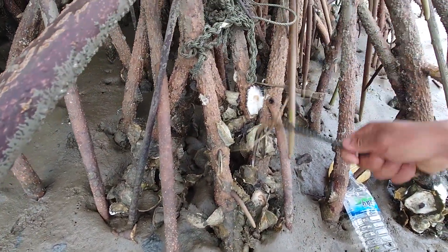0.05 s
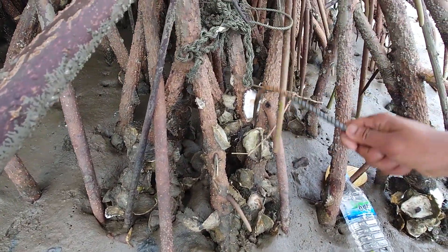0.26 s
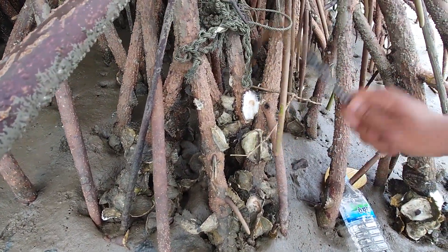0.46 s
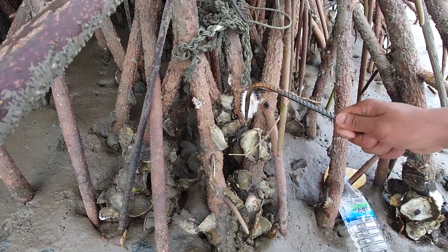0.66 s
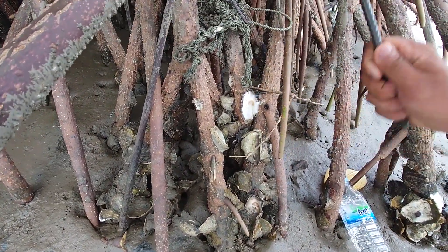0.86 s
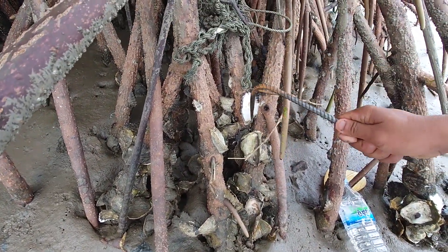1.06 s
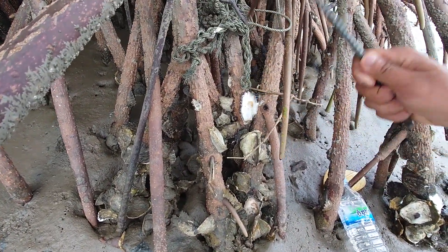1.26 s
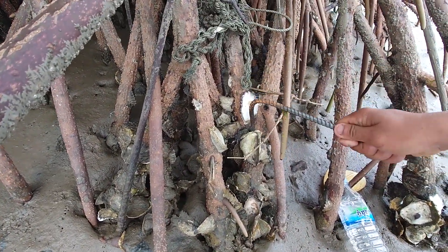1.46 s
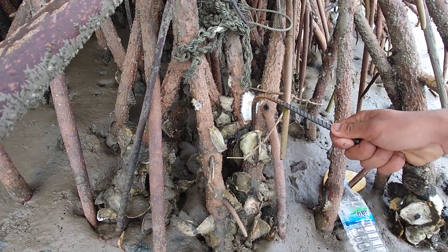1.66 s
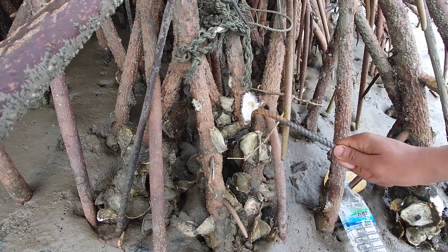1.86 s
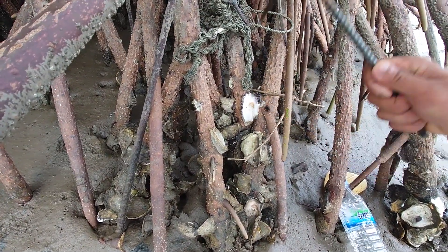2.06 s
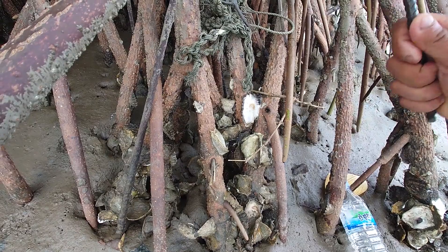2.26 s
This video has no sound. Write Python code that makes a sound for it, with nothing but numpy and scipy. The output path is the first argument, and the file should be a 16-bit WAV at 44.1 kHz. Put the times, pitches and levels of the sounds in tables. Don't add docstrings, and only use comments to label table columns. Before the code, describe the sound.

A steel rod strikes oyster shells on mangrove roots, four sharp bouncing clacks about half a second apart, then fine grit and chips tick down; outdoors in a swamp, close stereo microphone, faint low engine rumble behind.

```python
import sys
import numpy as np
from scipy import signal
from scipy.fft import rfft, irfft, next_fast_len
from scipy.io import wavfile
from scipy.ndimage import uniform_filter1d, map_coordinates

SR = 44100
rng = np.random.default_rng(int(sys.argv[2]) if len(sys.argv) > 2 else 0)


def decibels_to_gain(level_db):
    exponent = np.asarray(level_db, float) / 20
    return 10 ** exponent


def digitize_waveform(pressure):
    field = np.atleast_2d(pressure).T
    bounded = np.clip(field, -1, 1)
    quanta = np.round(bounded * 32767).astype(np.int16)
    wavfile.write(sys.argv[1], SR, quanta)


N = 101429
TIME_S = np.arange(N) / SR


def unit(x):
    return x / np.sqrt(np.mean(x ** 2) + 1e-20)


def along(points, hz):
    f, v = np.transpose(points)
    return np.interp(np.log(hz + 1), np.log(f + 1), v)


def level(rows):
    s, db = np.transpose(rows)
    return decibels_to_gain(np.interp(TIME_S, s, db))


def wobble(rate_hz):
    return map_coordinates(rng.standard_normal(80), [TIME_S * rate_hz], mode="wrap")


def filtered(x, response):
    n = x.shape[-1]
    padded = next_fast_len(n + 8192)
    spectrum = rfft(x, padded) * response(np.fft.rfftfreq(padded, 1 / SR))
    return irfft(spectrum, padded)[..., :n]


def resonance(hz, width_hz):
    return lambda f: 1 / (1 + ((f - hz) / width_hz) ** 2)


def paired(two, alike):
    def mid_side(hz):
        turn = np.arccos(np.clip(along(alike, hz), -1, 1)) / 2
        return np.array([np.cos(turn), np.sin(turn)])
    mid, side = filtered(two, mid_side)
    return np.array([mid + side, mid - side])


# (frequency [Hz], left-right likeness [0-1])
FAR_LIKENESS = [(100, 0.99), (500, 0.61), (1100, 0.017), (15000, .02)]


def noise(response):
    return unit(paired(filtered(rng.standard_normal((2, N)), response), FAR_LIKENESS))


# (frequency [Hz], density [dB per Hz])
RUMBLE_COLOUR = [(20, -41), (34, -23.5), (42, -2.5), (95, -3), (150, -13), (200, -17), (354, -19),
                 (600, -38.5), (800, -86)]
# (frequency [Hz], width [Hz], lift [dB])
ENGINE_TONES = [(45.3, 6.2, 5), (74.5, 5.8, 3), (121, 4.2, 5), (182, 7.4, 7.5)]
# (time [s], level [dB])
RUMBLE_LEVEL = [(0, -47.5), (.5, -48.5), (1, -47), (1.5, -50.5), (1.9, -48), (2.3, -46.5)]


def far_engine():
    def response(f):
        lift_db = sum(db * resonance(hz, width)(f) for hz, width, db in ENGINE_TONES)
        return decibels_to_gain(along(RUMBLE_COLOUR, f) + lift_db)
    drone = noise(response) * decibels_to_gain(2.3 * wobble(15))
    pan = decibels_to_gain(np.array([[.5], [-.5]]) * -3)
    return level(RUMBLE_LEVEL) * unit(drone) * pan


# (frequency [Hz], density [dB per Hz])
AIR_COLOUR = [(480, -8), (1370, -4), (1850, -8), (2300, -18.5), (5800, -26.5), (7450, -32), (9300, -29),
              (15300, -19.5)]


def forest_air():
    air = decibels_to_gain(-65 + .8 * wobble(6.9)) * noise(lambda f: decibels_to_gain(along(AIR_COLOUR, f)))
    hum = decibels_to_gain(-77) * noise(resonance(1711, 20))
    return air + hum


# (time [s], level [dB])
WHINE_LEVEL = [(0.0, -74.5), (.8, -75.5), (1.5, -78), (2.3, -72)]
# (time [s], level [dB])
CHIRR_LEVEL = [(0, -69), (.11, -72.5), (.16, -95.5), (2.3, -96.5)]


def insects():
    WHINE_HZ, DRIFT_HZ, PULSE_HZ, PULSE_DB = 8228, 46, 15.6, 5
    pulse_turn = 2 * np.pi * PULSE_HZ * TIME_S + 3.4 * wobble(2.2)
    pulse_db = PULSE_DB * np.sin(pulse_turn) + wobble(5.5)
    chirr = level(CHIRR_LEVEL) * noise(resonance(3180, 60))
    turns = np.cumsum(WHINE_HZ + DRIFT_HZ * wobble(30)) / SR + rng.random((2, 1))
    whine = .8 * unit(np.sin(2 * np.pi * turns)) + .5 * noise(resonance(WHINE_HZ, 90))
    return chirr + level(WHINE_LEVEL) * decibels_to_gain(pulse_db) * whine


# (frequency [Hz], level [dB])
FOREST_COLOUR = [(300, -21), (1500, -6), (2400, -5.5), (3300, -3), (6300, -4.5), (7500, -9), (10000, -9),
                 (15000, -10)]


def sand_trickle():
    MIDDLE_S, WIDTH_S, LEVEL_DB = 1.6, 0.065, -71.5
    swell = np.exp(-((TIME_S - MIDDLE_S) / WIDTH_S) ** 2)
    sand = rng.standard_normal((2, N)) ** 3
    return decibels_to_gain(LEVEL_DB) * swell * unit(filtered(sand, lambda f: decibels_to_gain(along(FOREST_COLOUR, f))))


# (time [s], peak level [dB])
GRIT = [(1.5518, -53), (1.5722, -47), (1.6121, -49), (1.6401, -52), (1.6665, -52), (1.6969, -56),
        (1.7323, -50), (1.8291, -64), (1.8825, -54), (1.9005, -57), (1.9229, -57), (1.9394, -54),
        (1.9763, -63), (2.0576, -66), (2.113, -64), (2.1329, -66), (2.1689, -71), (2.1813, -64),
        (2.2008, -68), (2.2372, -66)]


def grit_pitches():
    GRIT_HZ, GRIT_SPREAD = 14200, 0.041
    return [(s, db, GRIT_HZ * (1 + GRIT_SPREAD * rng.standard_normal())) for s, db in GRIT]


def falling_bits(rows, gain_db, cycles, spit_size, thinning):
    out, t = np.zeros((2, N + SR)), np.arange(SR // 50) / SR
    for s, db, hz in rows:
        swell = t * hz / cycles * np.exp(1 - t * hz / cycles)
        tone = np.sin(2 * np.pi * (hz * t + rng.random((2, 1)))) * swell
        rough = unit(uniform_filter1d(rng.standard_normal((2, len(t))), size=24))
        spit = signal.lfilter([1, -thinning], 1, rng.standard_normal((2, len(t))))
        spit = spit * spit_size * np.exp(-t / 0.0015)
        out[:, round(s * SR):][:, :len(t)] += decibels_to_gain(db + gain_db) * (tone * (1 + .5 * rough) + spit)
    return out[:, :N]


# (time [s], peak level [dB], frequency [Hz])
TICKS = [(.0645, -62, 14500), (.079, -63, 13500), (.0955, -59.5, 7230), (.79, -69, 4020),
         (.894, -55, 11900), (1.4385, -57.5, 13800), (1.587, -48, 13800), (1.686, -71.5, 6500),
         (1.764, -64, 5980), (1.848, -64.5, 3990), (1.871, -68, 5200), (1.893, -62, 5090),
         (1.896, -62, 3500), (1.923, -58, 3430), (1.939, -68, 6500), (2.012, -63, 4300),
         (2.017, -68.5, 5960), (2.08, -69.5, 5300)]


def grit_and_chips(grit):
    return falling_bits(grit, 0.5, 3.6, 0.65, 0.45) + falling_bits(TICKS, -1.5, 4.8, 1.2, 0.7)


def scatter(x, t60s, length, rise_s):
    hz, t, z = signal.stft(rng.standard_normal((2, length)), SR, nperseg=128)
    shape = decibels_to_gain(-60 * t / along(t60s, hz)[:, None]) * np.clip(t / rise_s, 0, 1)
    tail = signal.istft(z * shape, SR, nperseg=128)[1]
    return signal.fftconvolve(x, tail / np.linalg.norm(tail[0]), axes=1)


# (frequency [Hz], density [dB per Hz])
CRUNCH_COLOUR = [(120, -40), (200, -19.5), (1420, -8.5), (2460, -11), (4370, -7.5), (6430, -10.5),
                 (7060, -12), (14800, -6.5), (16500, -34)]


def contact(modes, tilt_db):
    RING_DB, CRUNCH_DB, CRUNCH_T60_S = 2, -11.5, 0.043
    RISE_S, CRACKS_S, CRACK_SIZE = 0.0002, 0.0018, 0.006
    MODE_SPREAD_DB, IN_STEP_BELOW_HZ, TILT_FROM_HZ = 1, 2200, 2400
    t = np.arange(SR // 10) / SR
    hz, width, db = np.transpose(modes)[:, :, None]
    width = np.maximum(width, 30 + .003 * hz)
    turns, _ = rng.random((2, len(modes), 1))
    sizes = rng.standard_normal((2, len(modes), 1))
    in_step = np.arange(len(modes))[:, None] / 2 + [[[0]], [[.25]]]
    starts = in_step + np.where(hz < IN_STEP_BELOW_HZ, 0, turns)
    decay = decibels_to_gain(db + MODE_SPREAD_DB * sizes) * width * np.exp(-np.pi * width * t)
    ring = (decay * np.sin(2 * np.pi * (hz * t + starts))).sum(1)
    cracks = rng.standard_normal((2, len(t))) ** 3 * np.exp(-t / CRACKS_S) * CRACK_SIZE
    cracks[:, 0] = 1
    ring = signal.fftconvolve(ring, cracks, axes=1)[:, :len(t)]

    def crunch_response(f):
        tilt = tilt_db * np.log2(np.maximum(f, TILT_FROM_HZ) / TILT_FROM_HZ)
        return decibels_to_gain(along(CRUNCH_COLOUR, f) + tilt)
    grains = filtered(rng.standard_normal((2, len(t))), crunch_response)
    crunch = decibels_to_gain(CRUNCH_DB - 60 * t / CRUNCH_T60_S) * unit(grains)
    return np.array([decibels_to_gain(RING_DB) * ring / abs(ring).max(), crunch]) * (1 - np.exp(-t / RISE_S))


# (time [s], peak level [dB], body number, treble tilt [dB per octave], echo level [dB])
CONTACTS = [(-.13, -5, 1, 9, 2), (0.1286, -4.5, 0, -1, -5.5), (0.1441, -4, 6, -4.5, 1.5),
            (0.165, -28.5, 10, 0, -7.5), (0.206, -36.5, 9, 3, -15), (0.5696, -9.5, 1, -5, 11),
            (0.5855, -14, 7, -5.5, -1), (0.642, -35.5, 4, -9, 0.5), (1.0073, -11, 2, -1.5, 12.5),
            (1.0259, -15.5, 8, -8, 2.5), (1.037, -21, 10, -9, -1), (1.3872, -30, 5, 5, 4),
            (1.4678, -7, 3, -4, 7.5), (1.508, -30, 8, -2, -13)]
# (frequency [Hz], width [Hz], level [dB])
SHELL_A = [(730, 280, -10), (1084, 88, -3.5), (1440, 100, -0.5), (2850, 110, -13.5), (3600, 240, -2.5),
           (4240, 54, -3), (4880, 100, -5.5), (5550, 55, -9), (6230, 110, 0), (7700, 210, -9.5),
           (8150, 200, -7.5), (10170, 150, 1.5), (11600, 83, 0), (14100, 120, -7.5)]
SHELL_B = [(454, 86, -8.5), (739.5, 100, -1), (1120, 190, -1), (1447, 240, 4.5), (2015, 180, -6.5),
           (3250, 120, -8), (3700, 120, -14), (4270, 210, -3), (4610, 47, -8.5), (5200, 110, -2),
           (6510, 160, -9), (10500, 1700, -31), (13330, 180, -2), (14900, 100, 1)]
SHELL_C = [(420, 370, -10), (770, 230, -9), (1214, 220, -1), (1510, 176, 3), (2000, 160, -4),
           (3203, 110, -2), (4190, 98, -3), (5620, 180, -9), (6500, 110, -3.5), (7470, 99, -14),
           (9500, 970, -15), (11200, 110, -9.5), (12500, 140, -10), (15200, 160, -7)]
SHELL_D = [(518, 58, 0.5), (1100, 250, 0), (1454, 150, 0.5), (1960, 40, -4), (2810, 150, -3.5),
           (3640, 81, -3.5), (4940, 200, -9.5), (5226, 180, 3.5), (5980, 160, -0.5), (8320, 100, -4.5),
           (9440, 180, -3.5), (10170, 130, -7.5), (12840, 120, -14.5), (14500, 150, -7)]
ROOT = [(756, 16, 4.5), (1400, 310, -12.5), (3000, 370, -27.5)]
CHIP = [(3916, 40, 1), (4600, 90, -3.5), (5390, 60, -2.5), (6200, 120, -5), (7110, 300, -3),
        (9090, 62, -14), (10200, 80, 0), (12010, 90, -12), (12700, 70, 4), (14200, 90, -2), (15400, 80, 1)]
REBOUND_A = [(750, 250, -8.5), (1140, 210, -5.5), (1480, 120, -7.5), (3200, 54, 3), (3650, 120, -4.5),
             (4350, 200, 2.5), (5100, 140, -3.5), (5630, 100, -4.5), (6480, 93, -0.5), (8300, 130, -7),
             (9600, 77, -6), (11500, 180, -7), (12500, 110, -5), (13400, 130, -7)]
REBOUND_B = [(800, 100, -11), (1453, 450, 1), (2900, 130, -1), (4320, 110, -1.5), (5200, 150, -9.5),
             (6400, 170, -4.5)]
REBOUND_C = [(750, 120, -4), (1500, 150, -6), (2850, 120, -3.5), (4320, 200, -6.5), (6400, 150, -6),
             (11000, 400, -21)]
THUD = [(333, 120, -4.5), (525, 93, -4.5), (1010, 200, -13)]
ROOT_SHORT = [(800, 110, 0.5), (1400, 110, -1.5), (3180, 200, -12), (4405, 200, -13.5)]
BODIES = [SHELL_A, SHELL_B, SHELL_C, SHELL_D, ROOT, CHIP, REBOUND_A, REBOUND_B, REBOUND_C, THUD, ROOT_SHORT]
# (frequency [Hz], t60 [s])
ROOT_T60 = [(300, 0.24), (1500, 0.1), (4000, 0.15), (12000, 0.08)]
FOREST_T60 = [(500, 0.76), (1500, 0.77), (4000, 0.56), (12000, 0.5)]
# (frequency [Hz], left-right likeness [0-1])
BLOW_LIKENESS = [(400, .92), (1400, 0.27), (3000, 0.27), (12000, 0.11)]


def rod_blows():
    ROOTS_DB, FOREST_DB, FOREST_RISE_S, THIN_BELOW_HZ = -10, -5.5, 0.031, 230
    lead = SR // 4
    out = np.zeros((2, lead + N + 2 * SR))
    for s, db, body, tilt_db, echo_db in CONTACTS:
        ring, crunch = decibels_to_gain(db) * contact(BODIES[round(body)], tilt_db)
        direct = paired(ring + crunch, BLOW_LIKENESS)
        roots = scatter(.3 * ring + crunch, ROOT_T60, SR // 5, 0.0027)
        forest = scatter(decibels_to_gain(db) * np.ones((2, 1)), FOREST_T60, SR, FOREST_RISE_S)
        forest = filtered(forest, lambda hz: decibels_to_gain(along(FOREST_COLOUR, hz)))
        for part, gain_db in [(direct, 0), (roots, ROOTS_DB), (forest, FOREST_DB + echo_db)]:
            out[:, lead + round(s * SR):][:, :part.shape[1]] += decibels_to_gain(gain_db) * part
    thin = lambda hz: (1j * hz / (THIN_BELOW_HZ + 1j * hz)) ** 3
    return filtered(out, thin)[:, lead:lead + N]


# (frequency [Hz], left minus right [dB])
PORTS = [(60, -12.5), (130, -11.5), (290, 2.5), (640, -1), (1410, 9), (3100, -10.5), (6820, -9),
         (15000, -3)]


def scene():
    grit = grit_pitches()
    above = rod_blows() + grit_and_chips(grit) + forest_air() + insects()
    low = far_engine()
    above = above + sand_trickle()
    return filtered(above, lambda hz: decibels_to_gain(np.array([[.5], [-.5]]) * along(PORTS, hz))) + low


def band_limit(x):
    return signal.sosfilt(signal.butter(12, 16820, fs=SR, output="sos"), x)


def record(dry):
    DUCK_OVER_DB, DUCK_DB = -16, -12
    ATTACK_S, HOLD_S, RELEASE_S = 0.034, 0.039, 0.051
    SOFT_TOP, TOP_HZ = 0.72, 15850
    loud = np.flatnonzero(abs(dry).max(0) > decibels_to_gain(DUCK_OVER_DB))
    starts = loud[np.diff(loud, prepend=-SR) > SR // 10] / SR
    corners = np.cumsum([0, ATTACK_S, HOLD_S, RELEASE_S])
    duck_db = sum(np.interp(TIME_S - s, corners, [0, DUCK_DB, DUCK_DB, 0]) for s in starts)
    ducked = dry * decibels_to_gain(duck_db)
    rounded = ducked / (1 + abs(ducked / SOFT_TOP) ** 4) ** .25
    mix = filtered(rounded, lambda hz: 1 / (1 + (hz / TOP_HZ) ** 60))
    return band_limit(mix)


dry = scene()
out = record(dry)
digitize_waveform(out)
```